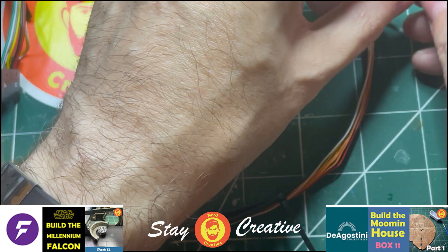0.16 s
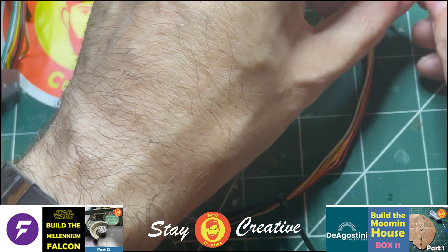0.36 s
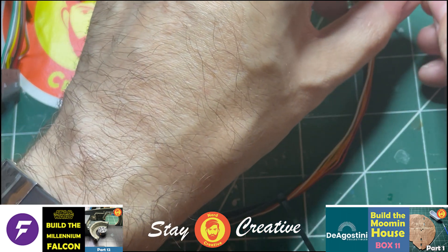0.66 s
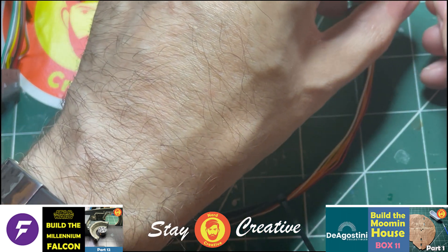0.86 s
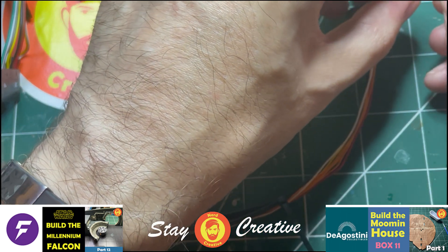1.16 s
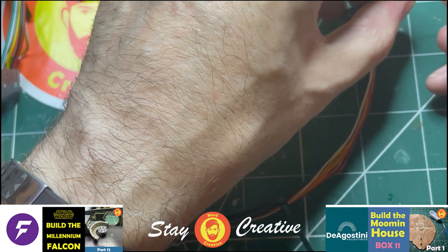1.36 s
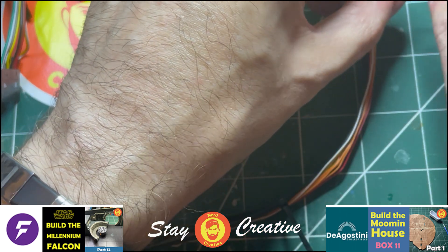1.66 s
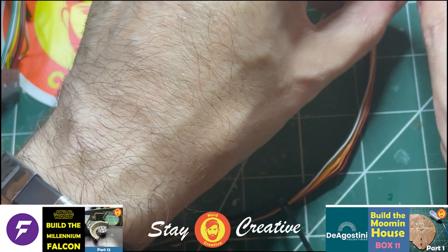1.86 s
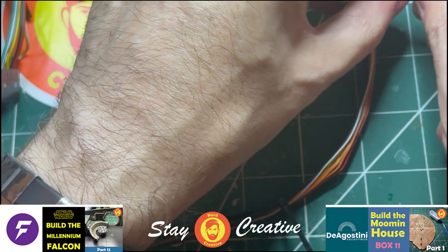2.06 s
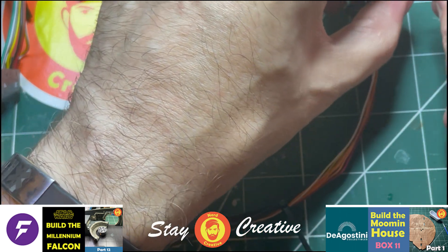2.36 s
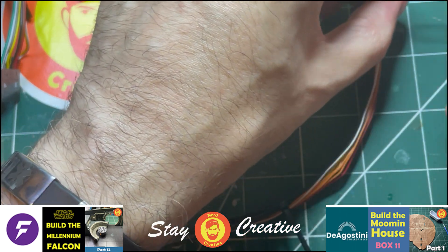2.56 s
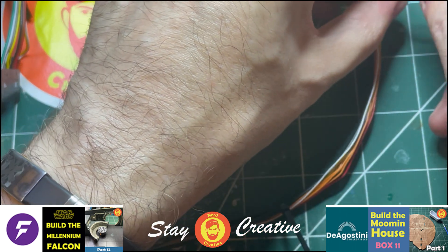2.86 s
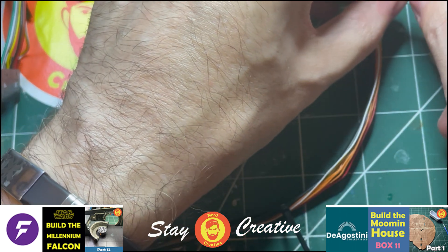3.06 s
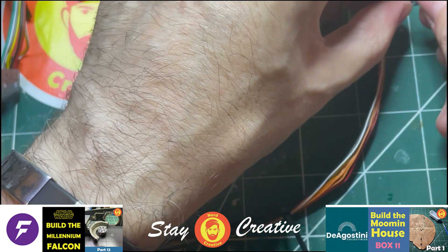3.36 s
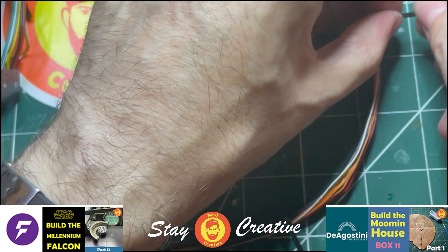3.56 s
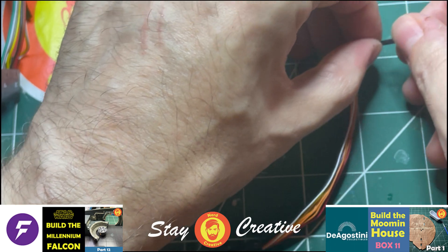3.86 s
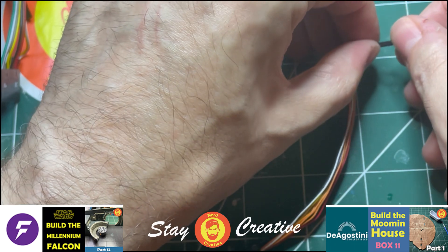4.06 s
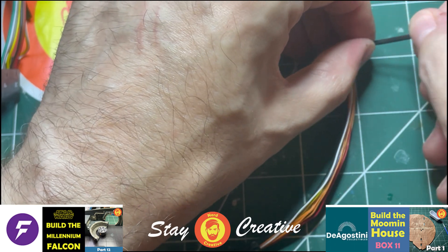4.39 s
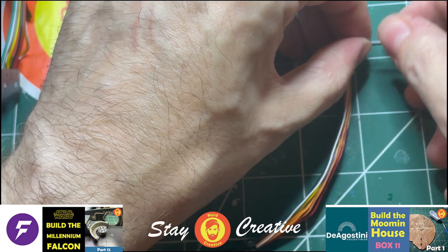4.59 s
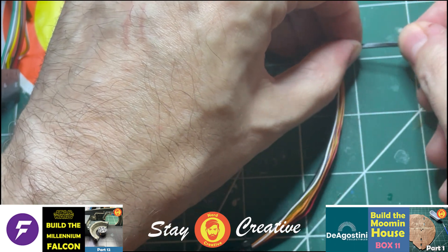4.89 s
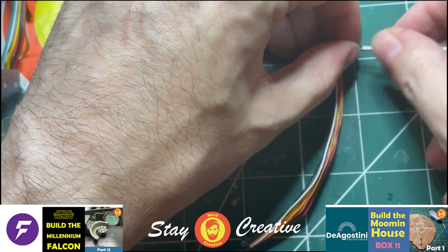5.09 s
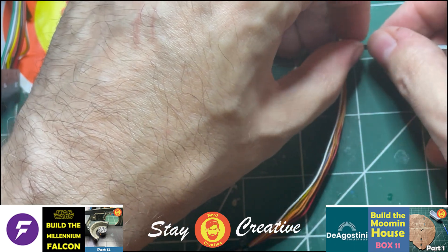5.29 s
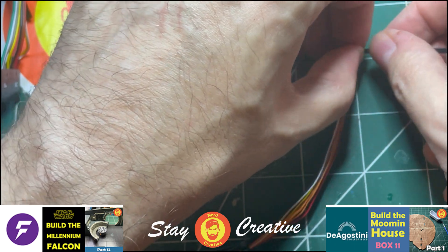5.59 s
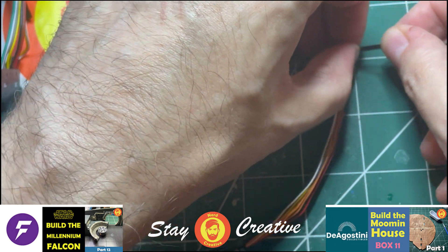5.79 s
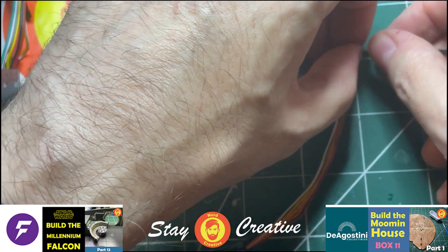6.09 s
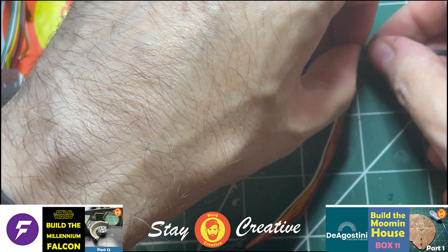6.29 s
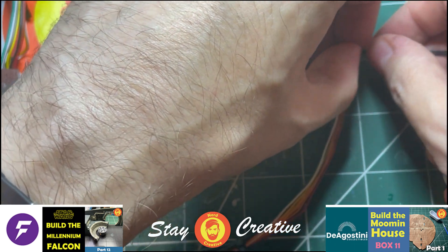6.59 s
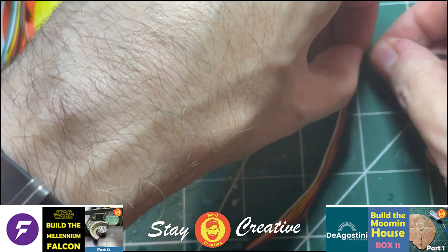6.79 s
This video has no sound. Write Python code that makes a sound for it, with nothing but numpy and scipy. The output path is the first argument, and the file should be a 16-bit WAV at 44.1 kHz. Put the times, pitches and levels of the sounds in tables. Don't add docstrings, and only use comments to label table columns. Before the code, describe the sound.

Small plastic tie pulled tight in short bursts of bright ratchet clicks, with hollow plastic knocks and scrapes over a low fan hum.

```python
import sys
import numpy as np
from scipy import signal
from scipy.fft import rfft, irfft, next_fast_len
from scipy.io import wavfile
from scipy.ndimage import uniform_filter1d, map_coordinates

SR = 44100
rng = np.random.default_rng(int(sys.argv[2]) if len(sys.argv) > 2 else 0)


def to_wav(sig):
    pcm = np.clip(np.atleast_2d(sig), -1, 1) * 32767
    pcm = np.round(pcm).astype(np.int16)
    wavfile.write(sys.argv[1], SR, pcm.T)


def makeup_ratio(level_db):
    decades = np.asarray(level_db, float) / 20
    return 10 ** decades


N = 305981

# (frequency [Hz], level [dB per Hz])
THUD_TONE = [(50, -28.5), (120, 5), (500, -2.5), (900, 1), (1500, -8), (3000, -36.5)]
# (frequency [Hz], level [dB per Hz])
BENCH_TONE = [(40, -26.5), (90, 3), (220, -8), (500, -27)]
# (frequency [Hz], level [dB per Hz])
EDGE_TONE = [(1000, -26), (1900, -11), (2900, -3), (4200, -2), (5600, 0.5), (7500, -0.5), (11000, -42)]
# (frequency [Hz], width [Hz], level [dB])
SHELL_MODES = [(1481.5, 31, -2), (1435, 190, -3.5), (1624, 390, -1), (2167, 870, 0), (2355, 320, 0),
               (2839, 110, -10.5)]


def ratchet():
    # (frequency [Hz], level [dB per Hz])
    tip_tone = [(6000, -35), (8000, -10.5), (11000, -8.5), (13500, -4.5), (15500, 4), (16700, -18),
                (17500, -100)]
    s, tip_db, pawl_db, thud_db, ms = teeth()
    crisp_db = -9 * np.log10(ms)

    def snap(db):
        direct = bursts(s - .0002, db + crisp_db + 1.5, .9 * ms ** 1.4, swell=1.0)
        bounce = bursts(s + 0.0014, db - 8.0, 0.55 * ms, swell=0.17)
        return direct + bounce

    thud = bursts(s + 0.00077, thud_db + 8, np.full(len(s), .8), swell=.3)
    clicks = colour(tip_tone)(snap(tip_db)) + colour(EDGE_TONE)(snap(pawl_db))
    return clicks + colour(THUD_TONE)(thud) + makeup_ratio(-3) * colour(BENCH_TONE)(thud)


def teeth():
    # (time [s], teeth past the pawl [count])
    strap_travel = [
        [(1.0398, 0), (1.1, 1)],
        [(1.2395, 0), (1.2472, 1)],
        [(2.2916, 0), (2.2955, 1), (2.3252, 5), (2.3454, 7)],
        [(2.4912, 0), (2.507, 3), (2.5236, 5), (2.5294, 6), (2.5552, 12), (2.5671, 14), (2.5771, 15)],
        [(2.7612, 0), (2.7704, 1)],
        [(4.1123, 0), (4.1266, 2), (4.1363, 3), (4.1659, 5)],
        [(4.2512, 0), (4.2685, 2), (4.2813, 3), (4.2983, 4), (4.3107, 5)],
        [(4.7858, 0), (4.8209, 4), (4.8361, 6), (4.8489, 8), (4.8829, 12), (4.8998, 13)],
        [(5.6045, 0), (5.6373, 2), (5.6608, 4), (5.6838, 5), (5.7109, 7), (5.7415, 8)],
        [(6.8155, 0), (6.8472, 1)],
    ]
    # (first tip [dB], last tip [dB], first pawl [dB], last pawl [dB], strap thud [dB])
    pull_levels = [
        (-45, -37.5, -42.5, -40, -59),
        (-30.5, -31.5, -35, -38.5, -55),
        (-27.5, -30, -37.5, -38.5, -55),
        (-30.5, -35.5, -37, -43, -53.5),
        (-48, -49, -62.5, -57, -65),
        (-32.5, -33, -38, -41, -54.5),
        (-31.5, -35.5, -38.5, -42.5, -56.5),
        (-32.5, -36, -42.5, -45, -51),
        (-34, -38.5, -35.5, -48, -54.5),
        (-40, -37.5, -40, -42.5, -48),
    ]
    # (time [s], loss [dB], smear [ms])
    half_caught = [(2.3029, -1.5, 0.67), (2.3178, -9.5, 0.94), (2.3454, -4, 1.05), (2.5017, -2.5, .7),
                   (4.1266, -2, .7), (4.1511, -7, 1.36), (4.2685, -7.5, 1.3), (4.8034, -4, 0.73),
                   (4.8659, 0.5, 1.4), (4.8998, -0.5, .7), (5.6209, -1, 1.1), (5.6608, -5, 1.1)]
    smear_ms, smear_grows = 0.43, .5
    rush_loss_db = 2
    break_pawl_db = -1.5
    slip_pawl_share = 0.44
    rows = []
    for travel, (tip0, tip1, pawl0, pawl1, thud) in zip(strap_travel, pull_levels):
        s, passed = np.transpose(travel)
        tooth = np.arange(passed[-1] + 1)
        s = np.interp(tooth, passed, s)
        share = tooth / passed[-1]
        rush = rush_loss_db * np.clip(np.log2(0.014 / np.gradient(s)), 0, 2)
        tip = tip0 + (tip1 - tip0) * share - rush
        pawl = pawl0 + (pawl1 - pawl0) * share + break_pawl_db * (tooth == 0)
        ms = smear_ms * (1 + smear_grows * share) * makeup_ratio(rush)
        rows.append([s, tip, pawl, np.full(len(s), thud), ms])
    s, tip, pawl, thud, ms = np.hstack(rows)
    for when, loss_db, smear in half_caught:
        k = abs(s - when).argmin()
        tip[k] += loss_db
        pawl[k] += slip_pawl_share * loss_db
        ms[k] = smear
    chance = rng.standard_normal((4, len(s)))
    return s, tip + chance[0], pawl + chance[1], thud + chance[2], ms * makeup_ratio(chance[3])


def jolts():
    # (time [s], level [dB])
    jolt_blows = [
        (1.5487, -55),
        (1.7319, -36),
        (2.2908, -33),
        (2.4908, -42),
        (3.3472, -34.5),
        (4.1125, -48.5),
        (4.2502, -44),
        (6.815, -45),
        (6.8466, -46),
    ]
    start_hz, fall_s, t60_s = 2801, .0007, 0.024
    t = np.arange(900) / SR
    chirp = np.sin(2 * np.pi * start_hz * fall_s * np.log(1 + t / fall_s)) * makeup_ratio(-60 * t / t60_s)
    return signal.fftconvolve(strikes(jolt_blows), chirp)[:N]


def part():
    # (frequency [Hz], level [dB per Hz])
    grit_tone = [(6000, -57), (8500, -1), (9500, -1.5), (12000, -5), (15800, -5.5), (16400, -48.5),
                 (17600, -120)]
    # (frequency [Hz], level [dB per Hz])
    mat_tone = [(50, -33), (100, -4), (280, 4), (600, -10.5), (1000, -7), (1600, -23), (3000, -43.5)]
    s, shell_db, edge_db, grit_db, mat_db, ms = contacts()
    shell = filtered(bursts(s, shell_db + 3.0, 0.55 * ms, swell=.3), modes(SHELL_MODES))
    edge = colour(EDGE_TONE)(bursts(s, edge_db + 0.5, 0.57 * ms, swell=0.33))
    grit = colour(grit_tone)(bursts(s, grit_db, 0.73 * ms, swell=.4))
    mat = colour(mat_tone)(bursts(s, mat_db + 5.5, 0.67 * ms, swell=0.11))
    return shell + edge + grit + mat


def contacts():
    # (time [s], level [dB], hardness [dB])
    ring_hits = [(0.9352, -45.5, 7), (0.9505, -43, -25.5), (0.9613, -72, 3), (1.4637, -65.5, -9),
                 (1.5471, -54, 8), (1.718, -37, 5), (1.7248, -37, 5), (1.7318, -16, -4),
                 (1.8379, -28.5, -8), (2.2913, -45.5, -4.5), (2.657, -49, -12), (2.6737, -65.5, 8),
                 (2.684, -58, 6), (2.952, -68, 8.5), (3.3485, -27, 9.5), (3.5677, -45.5, 4),
                 (6.8149, -43.5, -12), (6.8467, -49, -4.5)]
    # (time [s], level [dB], hardness [dB])
    chip_hits = [(0.968, -43, -11), (1.6239, -48.5, 5.5), (1.8113, -40.5, -3), (1.8195, -37, -2.5),
                 (1.8332, -40.5, -8), (1.8426, -32.5, -7), (1.8554, -34, 9), (1.8627, -32.5, -2),
                 (1.8706, -42, 7), (1.903, -43, 7), (1.909, -48.5, 1.5), (2.0154, -56.5, -4),
                 (2.0263, -49, -2), (2.031, -62, 4), (2.047, -59, 0), (2.0848, -54.5, -9),
                 (3.0573, -62, 6.5), (3.1114, -76, 4), (3.131, -63, -10), (3.18, -47.5, 9.5),
                 (3.1838, -48, 3), (3.2608, -59, -6), (3.2886, -54.5, 0), (3.3737, -34.5, 9),
                 (3.3966, -35.5, 3), (3.5165, -56, -6)]
    # (time [s], level [dB], hardness [dB])
    grind_hits = [(0.167, -59.5, 0), (0.9759, -42.5, -11.5), (1.51, -69.5, 9), (1.679, -52, -0.5),
                  (1.701, -53.5, 1.5), (1.744, -32.5, 1), (1.754, -31, 2), (1.7682, -39.5, 1.5),
                  (1.8953, -41, -3.5), (3.37, -29.5, 1.5), (3.4027, -45, 10), (3.412, -42, 0.5),
                  (4.7555, -61.5, -3), (5.897, -74.5, 14)]
    # (time [s], level [dB], hardness [dB])
    pat_hits = [(0.1654, -72, -1), (0.185, -58.5, 5.5), (0.5223, -66.5, 13.5), (.9672, -53.5, -8),
                (1.2611, -57, 7), (1.3012, -57, 17), (1.5482, -57, -2), (1.7318, -37.5, 2),
                (1.8367, -42.5, -2), (3.3468, -35.5, 1.5), (3.5698, -50, 0), (5.045, -58, -2),
                (5.1932, -76.5, 8.5), (5.8163, -64.5, -7), (5.919, -56, -3), (5.9913, -55.5, -4)]
    # (shell [dB], edge [dB], grit [dB], mat [dB], length [ms])
    kind_mix = [
        (-1, -12.5, -22, -16, 1.4),
        (-10, 1.5, -15.5, -22, 1.3),
        (-6, 0, -1, -16, 1.3),
        (-11.5, -22.5, -36, 1.5, 0.98),
    ]
    grit_hardens = 0.71
    blow_spares_mat, blow_db = 0.302, -40
    rows = []
    for hits, (shell, edge, grit, mat, ms) in zip((ring_hits, chip_hits, grind_hits, pat_hits), kind_mix):
        s, db, hard = np.transpose(hits)
        edge_db = db + edge + hard * (edge < -3)
        grit_db = db + grit + grit_hardens * hard
        mat_db = db + mat - blow_spares_mat * np.clip(db - blow_db, 0, None)
        rows.append([s, db + shell, edge_db, grit_db, mat_db, np.full(len(s), ms)])
    return np.hstack(rows)


def rim():
    # (time [s], level [dB])
    rim_blows = [
        (2.6574, -39.5),
        (2.7612, -49.5),
        (3.3473, -8),
        (3.3695, -19.5),
    ]
    return filtered(strikes(rim_blows), modes(SHELL_MODES[3:4]))


def drags():
    # (frequency [Hz], level [dB per Hz])
    rub_tone = [(1500, -38.5), (3000, -2), (5000, 1.5), (8000, -3.5), (11000, -8.5), (15800, -9.5),
                (16300, -62)]
    # (start [s], length [s], first [dB], last [dB], grit over shell [dB])
    rim_skids = [(1.473, .07, -85.5, -86, -5.5), (1.554, 0.2, -67, -69.5, 2.5),
                 (1.738, 0.049, -34.5, -54.5, 2), (1.796, 0.067, -55, -48.5, 5.5),
                 (1.922, 0.17, -74, -78.5, -18), (3.042, 0.2, -79.5, -85, -3),
                 (3.36, 0.05656, -39, -57, 6.5), (3.425, 0.097, -80, -96, -10.5),
                 (2.02, .03, -70.5, -81, 3.5), (3.19, 0.016, -83.5, -86, 4.5), (5.117, 0.12, -93, -88, 1.5),
                 (4.575, 0.19, -93, -100.5, 4.5)]
    # (start [s], length [s], first [dB], last [dB], grit over mat [dB])
    finger_rubs = [(0.938, 0.038, -56, -56, -38), (3.539, 0.078, -64.5, -64.5, -9),
                   (3.626, .23, -70, -72, -24), (5.047, .03, -64, -76, -8.5), (5.629, 0.119, -61, -65, -15),
                   (5.786, 0.0734, -80, -77, -18), (1.55, .05, -66.5, -76.5, -7.5)]
    bench_db, skid_mat_db, rub_shell_db = -7, -10.5, -7
    skin_hz = np.array([[4005], [8010]])
    clumps = makeup_ratio(3 * wobble(220) + 2.5 * wobble(60))

    def friction(voice):
        return unit(clumps * voice(rng.standard_normal(N)))

    mat = friction(colour(THUD_TONE)) + makeup_ratio(bench_db) * friction(colour(BENCH_TONE))
    shell = friction(lambda x: filtered(x, modes(SHELL_MODES)))
    grit = friction(colour(rub_tone))
    dull_shell, dull_grit = filtered(np.array([shell, grit]), lambda hz: 1 / (1 + (hz / skin_hz) ** 4))
    slides = np.zeros(N)
    for *path, grit_db in rim_skids:
        slides += stroke(*path) * (makeup_ratio(skid_mat_db) * mat + shell + makeup_ratio(grit_db) * grit)
    for *path, grit_db in finger_rubs:
        slides += stroke(*path) * (mat + makeup_ratio(rub_shell_db) * dull_shell + makeup_ratio(grit_db) * dull_grit)
    return slides


def stroke(start, length, first_db, last_db):
    grip_db_per_s, lift_db_per_s = 3000, 800.5
    t = np.arange(N) / SR - start
    pressure_db = np.interp(t, [0, length], [first_db, last_db])
    grip_db = grip_db_per_s * np.minimum(t, 0)
    lift_db = -lift_db_per_s * np.maximum(t - length, 0)
    return makeup_ratio(pressure_db + grip_db + lift_db)


def room(x):
    # (frequency [Hz], time to fall 60 dB [s])
    room_t60 = [(200, 0.4), (2000, 0.27), (8000, 0.16), (16000, 0.14)]
    hz, t, z = signal.stft(rng.standard_normal((4, 3, SR // 3)), SR, nperseg=256)
    tail = signal.istft(z * makeup_ratio(-60 * t / along(room_t60, hz)[:, None]), SR, nperseg=256)[1]
    tail = tail[:, :1] + 0.12 * tail[:, 1:]
    near = rng.standard_normal(tail.shape) * makeup_ratio(-60 * np.arange(tail.shape[2]) / SR / .006)
    near = signal.lfilter([1, -1], [1, -.95], near)
    answer = makeup_ratio(-13) * tail / np.linalg.norm(tail[0, 0]) + makeup_ratio(-6.5) * near / np.linalg.norm(near[0, 0])
    turns = np.arange(N) // 331 % 4 == np.arange(4)[:, None]
    late = np.pad(x * turns, ((0, 0), (20, 0)))[:, None]
    return signal.fftconvolve(late, answer, axes=2).sum(0)[:, :N]


def fan():
    # (time [s], level [dB])
    hum_levels = [(0.0, -66.5), (0.46, -66.5), (1.8, -62), (2.01, -64.5), (4.08, -63), (4.35, -61),
                  (5.43, -61.5), (6.94, -62)]
    # (frequency [Hz], width [Hz], level [dB])
    motor_lines = [(50.2, 1.8, -1.5), (295.6, 1.9, -11), (545, 3, -32.5)]
    # (frequency [Hz], level [dB per Hz])
    rumble_tone = [(25, -44.5), (40, -5.5), (70, -8.5), (100, -4.5), (135, -13.5), (184, -7.5),
                   (262, -15.5), (400, -28.5), (650, -64.5)]
    # (frequency [Hz], level [dB per Hz])
    air_tone = [(240, -28), (400, -3), (560, -8.5), (700, -10.5), (1100, -12.5), (2100, -17.5),
                (5000, -28.5), (7800, -26.5), (10500, -33), (15800, -30.5), (16300, -78.5)]
    t = np.arange(N) / SR
    hum_db = np.interp(t, *np.transpose(hum_levels))
    rumble_db = -67 + 1.6 * (hum_db - hum_db.mean())
    lines = np.zeros(N)
    for hz, width, db in motor_lines:
        drift = width * np.cumsum(wobble(6.8)) / SR
        lines += makeup_ratio(db + 1.2 * wobble(5)) * np.sin(2 * np.pi * (hz * t + drift))
    rumble = makeup_ratio(rumble_db + 3.0 + wobble(7)) * distant(lambda hz: makeup_ratio(along(rumble_tone, hz)))
    air = makeup_ratio(-79.0 + 0.54 * wobble(4.2)) * distant(lambda hz: makeup_ratio(along(air_tone, hz)))
    return makeup_ratio(hum_db + 4) * lines + rumble + air


def distant(response):
    # (frequency [Hz], likeness [0-1])
    port_likeness = [(60, .999), (200, .95), (400, 0.5), (700, .1), (1300, 0.01), (2400, .8), (10000, 1)]

    def mid_and_side(hz):
        turn = np.arccos(np.clip(along(port_likeness, hz), -1, 1)) / 2
        return response(hz) * np.array([np.cos(turn), np.sin(turn)])

    mid, side = filtered(rng.standard_normal((2, N)), mid_and_side)
    return unit(np.array([mid + side, mid - side]))


def bursts(s, db, ms, swell):
    t = (np.arange(640) - 200) / SR
    life = np.clip(ms, .05, 3)[:, None] / 1000
    shape = np.exp(-abs(t) / np.where(t < 0, swell * life, life))
    puff = shape * rng.standard_normal(shape.shape)
    bands = rfft(puff)
    puff = irfft(bands / np.sqrt(uniform_filter1d(abs(bands) ** 2, size=41)))
    puff *= (makeup_ratio(db) * np.linalg.norm(shape, axis=1) / np.linalg.norm(puff, axis=1))[:, None]
    where = np.round(s * SR).astype(int)[:, None] + np.arange(640)
    return np.bincount(where.ravel(), puff.ravel(), N + 640)[200:N + 200]


def strikes(table):
    blows = np.zeros(N)
    for s, db in table:
        blows[round(s * SR)] = makeup_ratio(db)
    return blows


def modes(table):
    def response(f):
        h = 0
        for k, (c, w, db) in enumerate(table):
            h = h + (-1) ** k * makeup_ratio(db) * 1j * f * w / (c * c - f * f + 1j * f * w)
        return h / np.sqrt(np.mean(abs(h) ** 2))
    return response


def colour(points):
    c = irfft(np.log(makeup_ratio(along(points, np.fft.rfftfreq(4096, 1 / SR))) + 1e-4))
    c[1:2048] *= 2
    c[2049:] = 0
    taps = irfft(np.exp(rfft(c)))
    return lambda x: signal.fftconvolve(x, taps / np.linalg.norm(taps))[:N]


def filtered(x, response):
    m = next_fast_len(N + 8192)
    return irfft(rfft(x, m) * response(np.fft.rfftfreq(m, 1 / SR)), m)[..., :N]


def along(points, hz):
    f, v = np.transpose(points)
    return np.interp(np.log(hz + 1), np.log(f + 1), v)


def wobble(rate):
    return map_coordinates(rng.standard_normal(int(N * rate / SR) + 4), [np.arange(N) * rate / SR])


def unit(x):
    return x / np.sqrt(np.mean(x ** 2) + 1e-20)


def scene():
    bench = ratchet() + jolts() + part() + rim() + drags()
    return bench + room(bench) + fan()


def low_pass(x):
    return signal.sosfilt(signal.butter(12, 17490, fs=SR, output="sos"), x)


def record(dry):
    # (frequency [Hz], phase [radians])
    left_lead = [(100, .05), (400, .4), (800, .6), (1640, -.4), (2600, .75), (4500, .75), (5100, -.1),
                 (7000, 2.95), (8300, 3.35), (9400, 4.9), (11300, 6.4), (14200, 9.4), (16200, 11.2)]

    def ports(hz):
        return np.exp(.5j * along(left_lead, hz) * [[1], [-1]]) * (hz < 17300)

    mix = filtered(dry, ports)
    return low_pass(mix)


dry = scene()
out = record(dry)
to_wav(out)
```